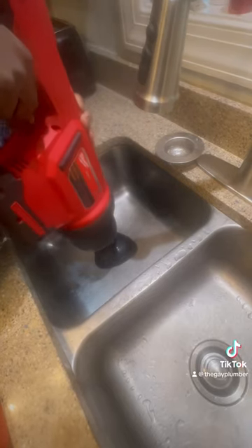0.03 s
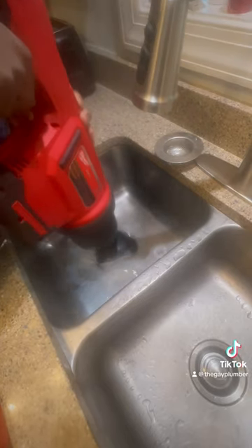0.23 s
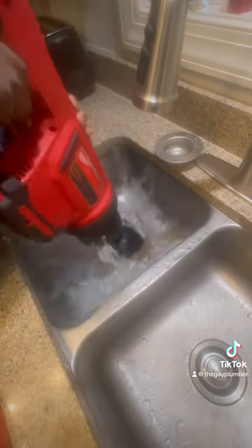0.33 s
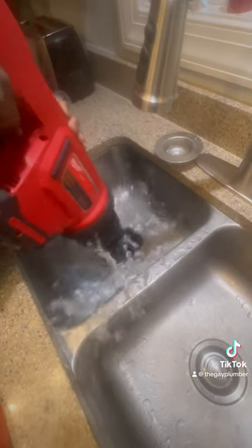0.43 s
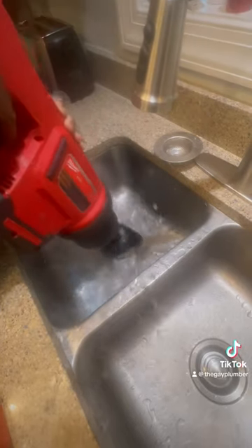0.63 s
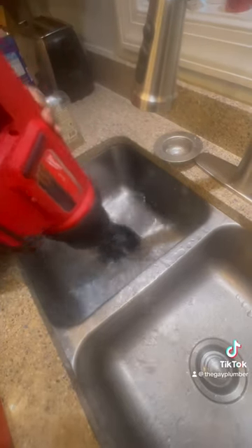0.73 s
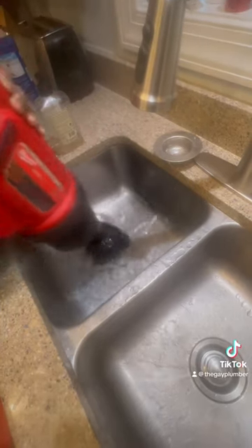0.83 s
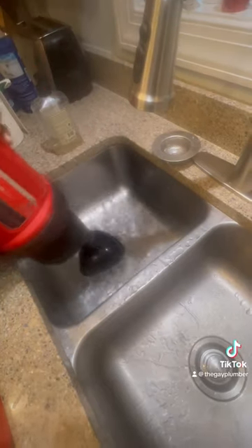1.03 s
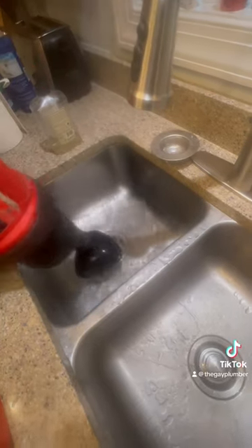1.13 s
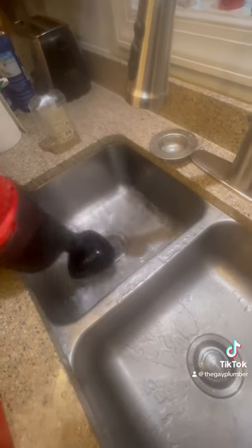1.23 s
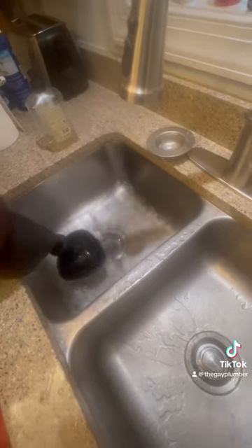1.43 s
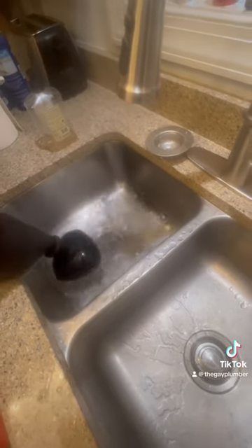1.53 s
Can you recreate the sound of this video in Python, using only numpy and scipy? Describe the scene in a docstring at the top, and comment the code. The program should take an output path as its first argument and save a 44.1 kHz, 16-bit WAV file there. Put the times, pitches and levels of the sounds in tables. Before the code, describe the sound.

An air drain gun fires into a flooded steel sink, close to a phone microphone in a kitchen. Faint low room hum until 0.2 s, then a very short hiss and deep, blunt thump, with wet bubbling and basin rumble to 0.35 s. Glugs, splashes and bright plops crowd 0.35-1.1 s, strongest near 0.6 s, thinning to sparse drips; a soft, low rubber bump at 1.3 s, then near quiet until 1.6 s.

```python
"""Air gun in a kitchen drain

An air gun fires into the flooded drain of a steel sink: a short hiss (shaped noise) and a deep thump (a gliding sine).
Thrown water falls back, splashes, glugs and bubbles (noise, crowds of tiny pings and single plops), then settles.
The steel basin rumbles along, and the rubber cup bumps it once more.
A phone with two microphone ports stands close, so left and right differ a little."""
import sys
import numpy as np
from scipy import signal
from scipy.fft import rfft, irfft
from scipy.io import wavfile

SR = 44100
rng = np.random.default_rng(int(sys.argv[2]) if len(sys.argv) > 2 else 0)


def wav_record(signal):
    """Record a signal, one row per channel, as 16-bit PCM in the file named by sys.argv[1]."""
    frames = np.transpose(np.atleast_2d(signal))
    bounded = np.clip(frames, -1, 1)
    # unit amplitude maps onto the largest positive 16-bit level
    quanta = np.round(bounded * 32767).astype(np.int16)
    wavfile.write(sys.argv[1], SR, quanta)


N = 70560  # samples in the scene: 1.6 s


def gain_of(db):
    """Turns decibels into a factor for the wave."""
    return 10 ** (np.asarray(db) / 20)


def evened(x):
    """Scales a signal to an average (RMS) strength of 1."""
    return x / np.sqrt(np.mean(x ** 2) + 1e-20)


def coloured(x, points):
    """Makes some pitches stronger than others, following (f/Hz, level/dB) points, then evens the strength."""
    f, db = np.transpose(points)
    hz = np.fft.rfftfreq(N, 1 / SR)
    curve_db = np.interp(np.log(hz + 1), np.log(f + 1), db)
    return evened(irfft(rfft(x) * gain_of(curve_db), N))


def level(curve):
    """Gain over time from (t/s, level/dB) points, with a short fade at both ends."""
    s, db = np.transpose(curve)
    times = [s[0] - .02, *s, s[-1] + .05]
    return gain_of(np.interp(np.arange(N) / SR, times, [-120, *db, -120]))


def add(mix, s, sound):
    """Mixes a sound in at a time in seconds, cut off at the end of the scene."""
    part = mix[max(round(s * SR), 0):][:len(sound)]
    part += sound[:len(part)]


def swell(length, from_hz, to_hz, skew):
    """A big air pocket: a low sine that swells and fades while its pitch glides."""
    u = np.arange(0, length, 1 / SR) / length  # runs from 0 to 1
    envelope = np.sin(np.pi * u ** skew)
    hz = from_hz + (to_hz - from_hz) * u
    return envelope * np.sin(2 * np.pi * np.cumsum(hz) / SR)


BUBBLE_RISE, BUBBLE_ATTACK = 0.00413, 3.5  # share of pitch gained per cycle; cycles to swell


def ping(hz, cycles):
    """One bubble: a sine that swells quickly, dies by 60 dB over the given cycles and climbs in pitch."""
    n = np.arange(int(cycles / hz * SR) + 8) / SR * hz  # time counted in cycles
    attack = np.sin(np.pi / 2 * np.minimum(n / BUBBLE_ATTACK, 1)) ** 2
    decay = gain_of(-60 * n / n[-1])
    return attack * decay * np.sin(2 * np.pi * n * (1 + BUBBLE_RISE * n / 2))


def grains(per_s, spread_db, lo_hz, hi_hz, cycles, count):
    """Many small bubbles: pings at random moments, in random sizes and one of count pitches."""
    size = gain_of(spread_db * np.minimum(rng.exponential(1, N), 5))
    size = size * (rng.random(N) < per_s / SR)  # most samples start no ping
    which = rng.integers(0, count, N)
    crowd = np.zeros(N)
    for k, hz in enumerate(np.geomspace(lo_hz, hi_hz, count)):
        crowd += signal.oaconvolve(size * (which == k), evened(ping(hz, cycles)))[:N]
    return evened(crowd)


THUMP_S, THUMP_LEN_S, THUMP_DB = .2252, .0262, -10
THUMP_FROM_HZ, THUMP_TO_HZ, THUMP_SKEW = 174, 104, 1.2
THUMP_DRIVE, THUMP_LEAN = 1.8, -.15  # how flat the wave tops get; how lopsided the wave is
PUSH_S, PUSH_LEN_S, PUSH_DB = .21, .055, -25  # slow shove of the counter
# Low air pockets and bumps: t/s, level/dB, f/Hz, length/s, pitch sag as a share (negative: pitch rises)
GLUG_POCKETS = [(.275, -26, 133.8, 0.054, 0.4), (0.366, -32.5, 129, 0.037, 0.017),
                (.43, -32, 151.4, 0.05, 0.22), (0.494, -33.5, 125, 0.026, -0.12),
                (0.564, -41, 127, 0.02, 0.023), (0.694, -30, 124, 0.019, 0.032),
                (0.711, -37.5, 361.4, 0.039, -0.21), (1.314, -30, 77.5, 0.06, 0.28),
                (1.383, -45.5, 93, 0.053, 0.082), (1.453, -49.5, 113, 0.051, 0.014),
                (.93, -48, 122, .04, -0.04)]


def pockets():
    """Big air pockets push the water: the flat-topped thump, the shove under it and the later glugs."""
    out = np.zeros(N)
    wave = swell(THUMP_LEN_S, THUMP_FROM_HZ, THUMP_TO_HZ, THUMP_SKEW)
    leaning = wave + THUMP_LEAN * wave ** 2
    add(out, THUMP_S, -gain_of(THUMP_DB) * np.tanh(THUMP_DRIVE * leaning))
    add(out, PUSH_S, gain_of(PUSH_DB) * swell(PUSH_LEN_S, 31, 42, 0.79))
    for s, db, hz, length, sag in GLUG_POCKETS:
        add(out, s, gain_of(db) * swell(length, hz * (1 + sag), hz * (1 - sag), 0.44))
    return out


STRIKE_DB = -35  # how hard pockets ring the basin
# Tones the steel basin rings at: f/Hz, relative level/dB, time to die 60 dB/s
BASIN_MODES = [(34.3, -30, 0.07), (62.3, -17, 1), (92, -5, 0.41), (124, 3, 0.44), (169.6, -0.5, 0.04),
               (232.5, 2.5, 0.053), (308, -7, 0.23), (334.4, -7.5, 0.41), (381, -18.5, 0.31),
               (567, -6.5, 0.22), (712, -15, 0.059), (886, -20, 0.15)]
# Strength of the water shaking the basin: t/s, level/dB
CHURN_LEVEL = [(.2, -49), (.212, -30.5), (.224, -24), (.255, -23), (.3, -28.5), (.335, -36), (.37, -40),
               (.5, -46), (.6, -50), (.72, -44.5), (.83, -47.5), (.94, -53.5), (1.1, -58), (1.3, -56.5),
               (1.36, -56.5), (1.45, -57), (1.6, -56)]


def basin(blows):
    """The pockets strike the steel, and turbulent water (noise) keeps its tones rumbling."""
    t = np.arange(SR // 3) / SR
    ring = np.zeros(len(t))
    for hz, db, t60 in BASIN_MODES:
        # The square root keeps long tones from taking over
        ring += gain_of(db - 60 * t / t60) * np.sin(2 * np.pi * hz * t) / np.sqrt(t60)
    struck = gain_of(STRIKE_DB) * signal.oaconvolve(np.gradient(blows), ring)[:N]
    rumble = evened(signal.oaconvolve(rng.standard_normal(N), ring)[:N])
    return struck + level(CHURN_LEVEL) * rumble


# Strength of the escaping air: t/s, level/dB
JET_LEVEL = [(.199, -55), (.21, -39), (.213, -27), (.218, -22.5), (.224, -16.5), (.229, -24), (.24, -41),
             (.258, -40), (.271, -33.5), (.284, -41), (.302, -52), (.36, -74)]
# Tone colour of the escaping air: f/Hz, relative level/dB
JET_SPECTRUM = [(300, -1), (1000, -3.5), (1800, -3), (2350, 6.5), (3000, -5.5), (5000, 1), (7000, -3),
                (10000, -9), (13000, -19.5), (16000, -26)]


def jet():
    """Compressed air rips past the rubber cup: shaped noise."""
    return level(JET_LEVEL) * coloured(rng.standard_normal(N), JET_SPECTRUM)


FIZZ_PER_S, FIZZ_SPREAD_DB, FIZZ_CYCLES = 2400, 3.4, 30
FIZZ_DB = -1  # against the rush
# Strength of the falling water: t/s, level/dB
SPLASH_LEVEL = [(0.3, -48), (0.35, -56), (0.53, -44.5), (0.57, -45), (0.604, -37), (0.72, -44.5),
                (0.756, -52.5), (0.824, -39), (0.832, -48.5), (0.864, -54), (0.89, -43), (1.11, -60),
                (1.194, -63), (1.216, -54), (1.244, -63), (1.288, -64.5), (1.31, -53), (1.328, -63),
                (1.494, -60.5), (1.58, -66.5), (1.592, -64), (1.6, -50.5)]
# Tone colour of the falling water: f/Hz, relative level/dB
SPLASH_SPECTRUM = [(500, -30), (1500, -9), (2500, -8.5), (3200, -7.5), (5500, -0.5), (8000, -9.5),
                   (10500, -8), (13000, -25.5), (16000, -40)]


def splash():
    """Falling water: a rush (noise) and a fizz of droplets (high pings)."""
    fizz = grains(FIZZ_PER_S, FIZZ_SPREAD_DB, 2370, 14600, FIZZ_CYCLES, count=40)
    water = rng.standard_normal(N) + gain_of(FIZZ_DB) * fizz
    return level(SPLASH_LEVEL) * coloured(water, SPLASH_SPECTRUM)


GURGLE_PER_S, GURGLE_SPREAD_DB, GURGLE_CYCLES = 1600, 2.6, 24
GURGLE_RUSH_DB = -2  # wet rush against the bubbles
# Strength of the bubbling: t/s, level/dB
GURGLE_LEVEL = [(.228, -27.5), (.245, -28.5), (.258, -40.5), (.272, -34), (.3, -47), (.354, -58),
                (.42, -46), (.5, -49.5), (.54, -46), (.57, -47.5), (.59, -40.5), (.645, -39.5),
                (.72, -44.5), (.76, -52.5), (.825, -42), (.86, -47), (.905, -48), (.94, -47.5), (1.03, -59),
                (1.075, -53), (1.13, -68), (1.3, -68.5), (1.6, -76)]
# Tone colour of the bubbling: f/Hz, relative level/dB
GURGLE_SPECTRUM = [(250, -100), (450, -1), (700, -6.5), (1200, 3.5), (2000, 6), (2700, 7.5), (4000, -15.5)]


def gurgle():
    """A crowd of small overlapping bubbles (pings) in a wet rush (noise)."""
    crowd = grains(GURGLE_PER_S, GURGLE_SPREAD_DB, 462.8, 2970, GURGLE_CYCLES, count=32)
    rush = gain_of(GURGLE_RUSH_DB) * rng.standard_normal(N)
    return level(GURGLE_LEVEL) * coloured(crowd + rush, GURGLE_SPECTRUM)


WOBBLE_DB, WOBBLE_HZ = 2.2, 250  # roughness of each plop: its average size and how fast it goes
# Single plops: t/s, level/dB, f/Hz, cycles to die 60 dB
PLOPS = [(0.364, -36.5, 1920, 67), (0.373, -28.5, 854, 55), (0.445, -36, 1890, 73), (0.481, -30, 3600, 62),
         (0.535, -33.5, 1496, 62), (0.584, -35.5, 784, 59), (0.61, -25.5, 1642, 54),
         (0.641, -30.5, 1264, 56), (0.679, -27, 1906, 72), (0.743, -28.5, 1687, 58), (0.782, -34, 1190, 54),
         (0.897, -36.5, 1550, 65), (0.959, -25.5, 1690, 55), (0.973, -39, 1817, 73), (0.99, -32.5, 991, 51),
         (1.016, -37.5, 1875, 65), (1.041, -41.5, 1870, 65), (1.06, -35, 1397, 67), (1.084, -42, 1875, 65),
         (1.214, -42, 3310, 68), (1.429, -48.5, 1504, 59), (1.5, -52.5, 2035, 77), (1.59, -42.5, 3360, 75)]
# Fine drops ticking on the steel: t/s, level/dB, f/Hz, cycles to die 60 dB
STEEL_DROPS = [(0.709, -30, 2706, 97), (0.82, -32, 5720, 90), (0.8854, -43, 5240, 90),
               (0.9911, -37, 9060, 90), (1.152, -56, 4000, 90), (1.3015, -53, 4530, 88),
               (1.4301, -50, 5320, 96), (1.4676, -46, 5120, 95)]


def bubbles():
    """The clearest single plops and drops: pings with a slightly unsteady level."""
    out = np.zeros(N)
    for s, db, hz, cycles in [*PLOPS, *STEEL_DROPS]:
        add(out, s, gain_of(db) * ping(hz, cycles))
    slow_noise = coloured(rng.standard_normal(N), [(1, 0), (WOBBLE_HZ, 0), (3 * WOBBLE_HZ, -60)])
    return out * gain_of(WOBBLE_DB * slow_noise)


HOLLOW_WIDTH_HZ = 77  # width of the resonance
# Air hollows that fill or open: t/s, length/s, level/dB, start f/Hz, end f/Hz
AIR_HOLLOWS = [(0.373, .06, -44, 821, 1502), (0.499, 0.0665, -46, 1576, 1656),
               (0.623, .09, -44, 754.7, 512.6), (0.773, .17, -46.5, 404.7, 771.7),
               (0.797, .13, -47, 900, 1090)]


def hollows():
    """Noise in narrow resonances that glide as the hollows change size."""
    out = np.zeros(N)
    r = np.exp(-np.pi * HOLLOW_WIDTH_HZ / SR)
    raw = rng.standard_normal(N) + 1j * rng.standard_normal(N)
    narrow = signal.lfilter([1], [1, -r], raw)  # narrow noise around 0 Hz
    for s, length, db, from_hz, to_hz in AIR_HOLLOWS:
        u = np.arange(0, length, 1 / SR) / length
        hz = from_hz + (to_hz - from_hz) * u
        turn = np.exp(2j * np.pi * np.cumsum(hz) / SR)  # moves the noise up to the gliding pitch
        tone = evened((turn * narrow[round(s * SR):][:len(u)]).real)
        add(out, s, gain_of(db) * np.sin(np.pi * u) ** .5 * tone)
    return out


# Timing between the ports: f/Hz, phase by which left leads/radians
PORT_LEAD = [(0, 0.33), (250, -0.12), (860, 1), (1980, 0.71), (2930, 2.0), (3790, 1.17), (4570, 1.65),
             (5430, 1.43), (6980, 2), (9470, 7), (9910, 7.5), (12900, 4.5), (13800, -4), (15600, -3.5)]
# Loudness between the ports: f/Hz, left minus right level/dB
PORT_LEVELS = [(60, 0), (110, 0), (200, 3.5), (380, 5.0), (700, 9.5), (1290, 1), (2380, 1.5), (4400, 1.5),
               (8120, -1), (15000, 1)]


def ports(x):
    """Each microphone port hears its own phase and level; half of each difference goes to each side."""
    hz = np.fft.rfftfreq(N, 1 / SR)
    lead = np.interp(hz, *np.transpose(PORT_LEAD))
    balance_db = np.interp(hz, *np.transpose(PORT_LEVELS))
    half = np.exp(.5j * lead) * gain_of(balance_db / 2)
    return irfft(rfft(x) * [half, 1 / half], N)


ECHO_DB, ECHO_T60_S, ECHO_HZ = -7, .09, 400  # level; time to die 60 dB; low cut


def echo(x, count=3):
    """Short dense reflections off basin walls and tiles, different on each side.

    Random sets of reflections fade in and out in turn for a smooth tail."""
    t = np.arange(SR // 5) / SR
    low_cut = signal.butter(2, ECHO_HZ, "high", fs=SR, output="sos")
    out = np.zeros((2, N))
    for k in range(count):
        # The squares of the shares always add up to 1
        share = np.sqrt(2 / count) * np.cos(np.pi * (np.arange(N) / SR * 25 + k / count))
        taps = rng.standard_normal((2, len(t))) * gain_of(-60 * t / ECHO_T60_S)
        taps = signal.sosfilt(low_cut, taps / np.linalg.norm(taps[0]))
        out += signal.fftconvolve((share * x)[None], taps, axes=1)[:, :N]
    return gain_of(ECHO_DB) * out


ROOM_DB = -57.5
# Tone colour of the steady background: f/Hz, relative level/dB
ROOM_SPECTRUM = [(15, -54), (25, -50), (43, 3), (112, 4), (145, 6), (256, -10.5), (323, -0.5), (407, -16.5),
                 (756, -17.5), (839, -19.5), (1200, -23), (1340, -23), (12000, -53.5), (15600, -85),
                 (22000, -120)]


def room():
    """Steady background noise, partly shared between left and right."""
    a, b = (coloured(z, ROOM_SPECTRUM) for z in rng.standard_normal((2, N)))
    return gain_of(ROOM_DB) * np.array([a + 0.5 * b, a - 0.13 * b])


def scene():
    """All the air and water, heard directly and as echoes, over the room."""
    blows = pockets()
    water = blows + basin(blows) + jet() + splash() + gurgle() + bubbles() + hollows()
    return ports(water) + echo(water) + room()


EDGE_HZ = 15980  # upper band edge


def record(dry):
    """The band limit: a filter removes what lies above the edge."""
    low_pass = signal.firwin(511, EDGE_HZ, window=("kaiser", 9), fs=SR)
    return signal.oaconvolve(dry, low_pass[None], "same")


dry = scene()
out = record(dry)
wav_record(out)
```